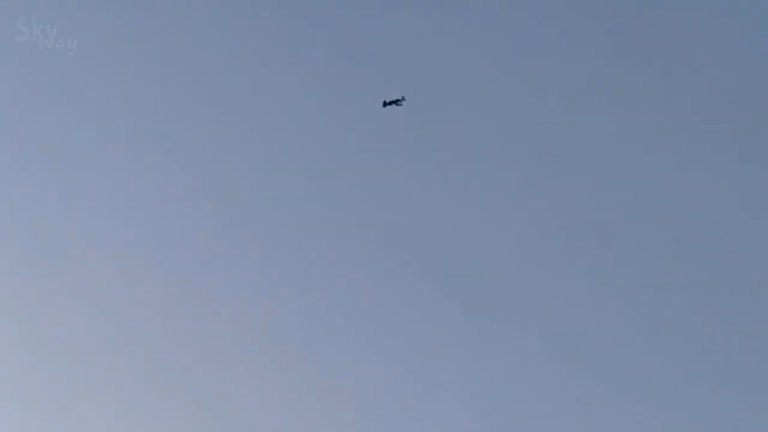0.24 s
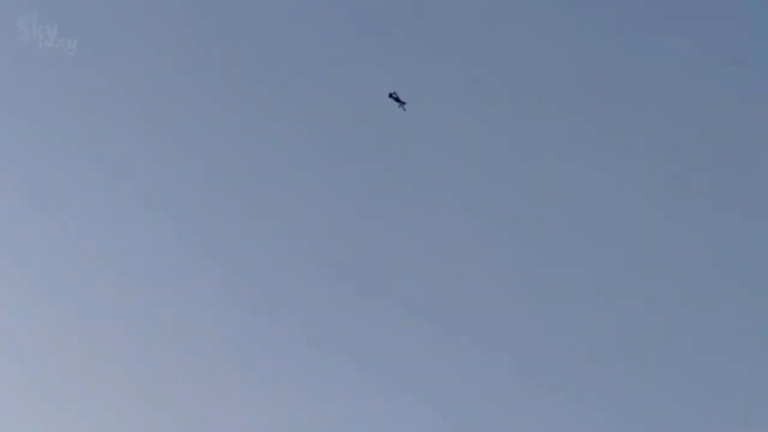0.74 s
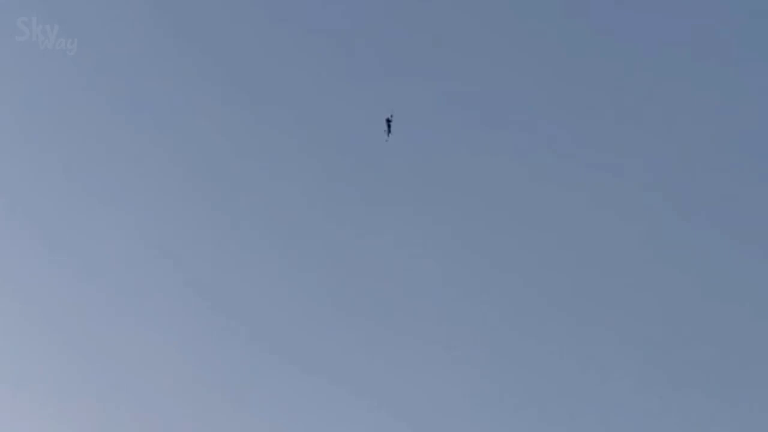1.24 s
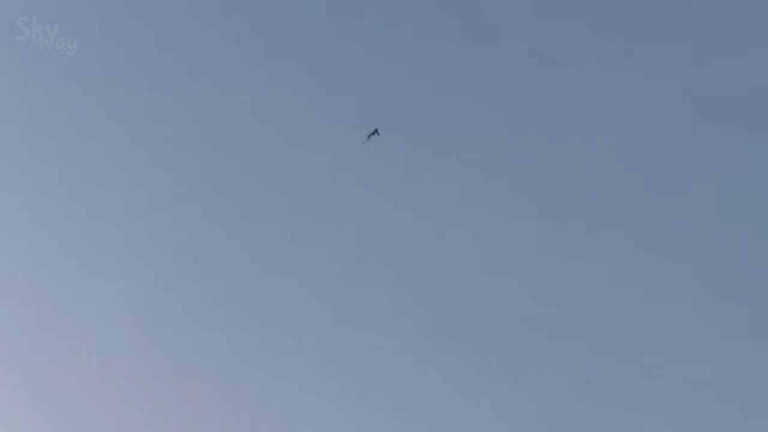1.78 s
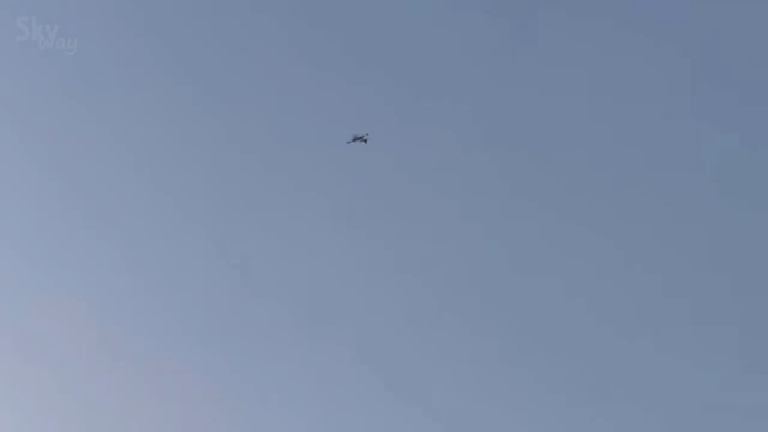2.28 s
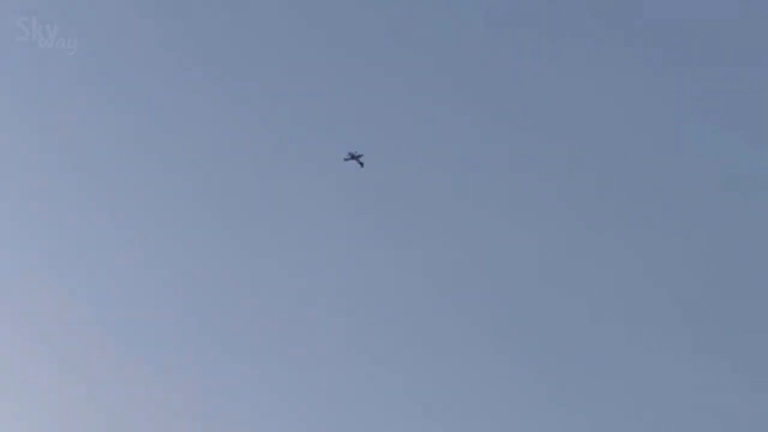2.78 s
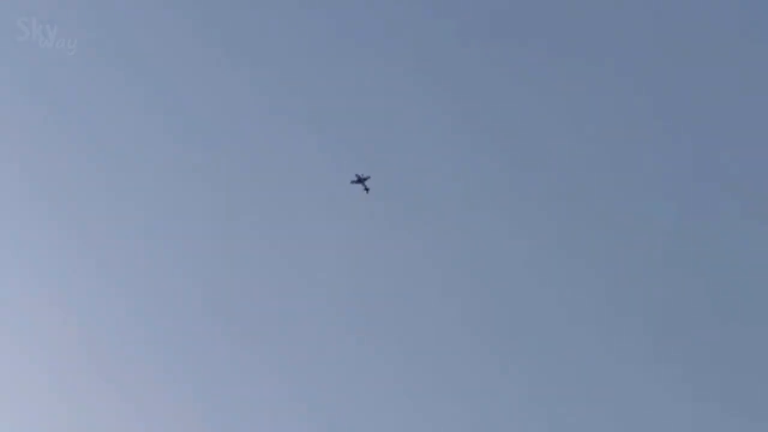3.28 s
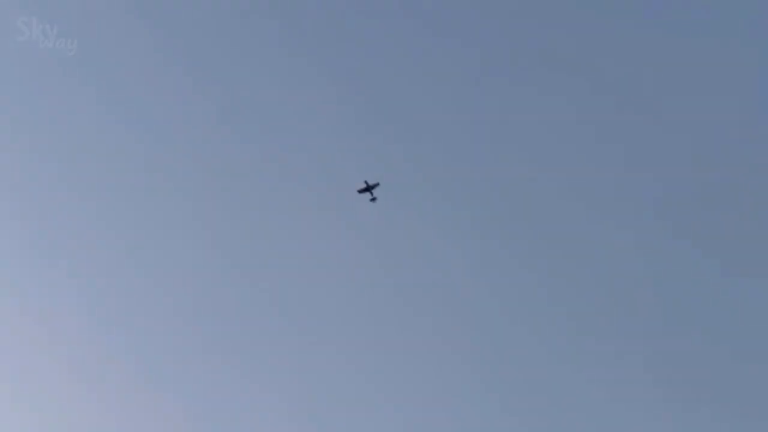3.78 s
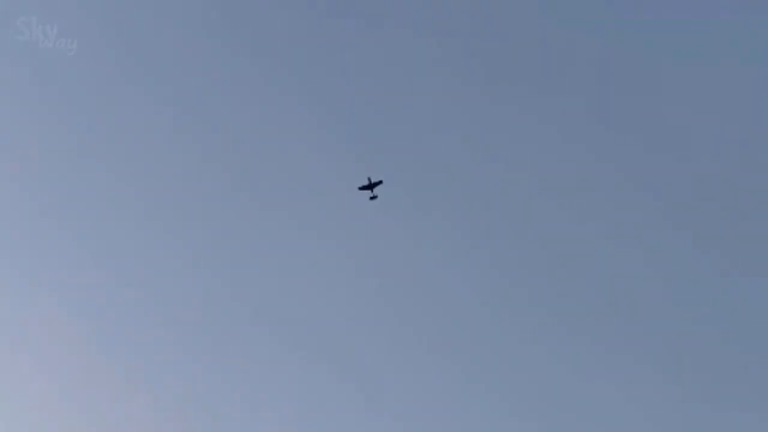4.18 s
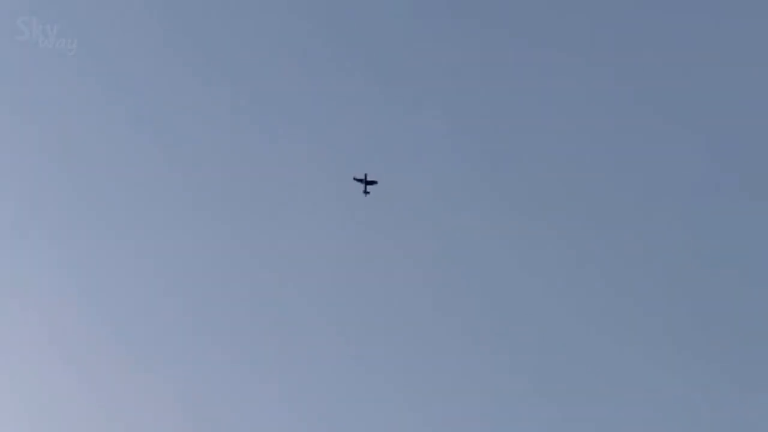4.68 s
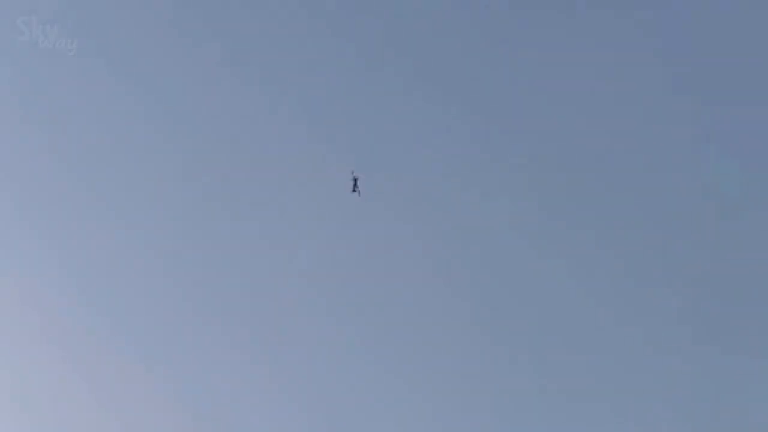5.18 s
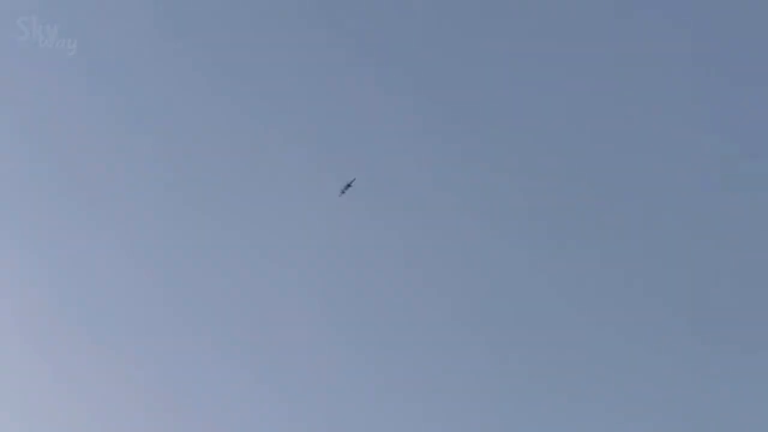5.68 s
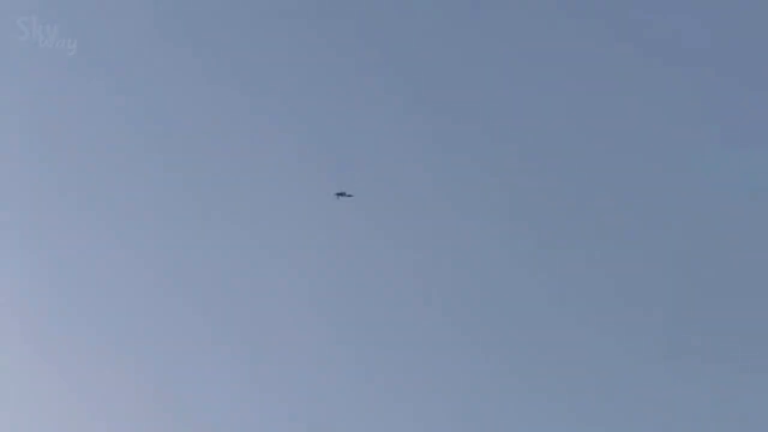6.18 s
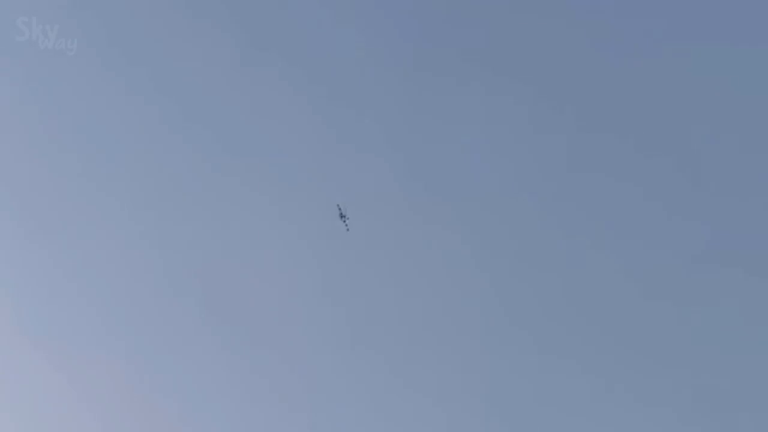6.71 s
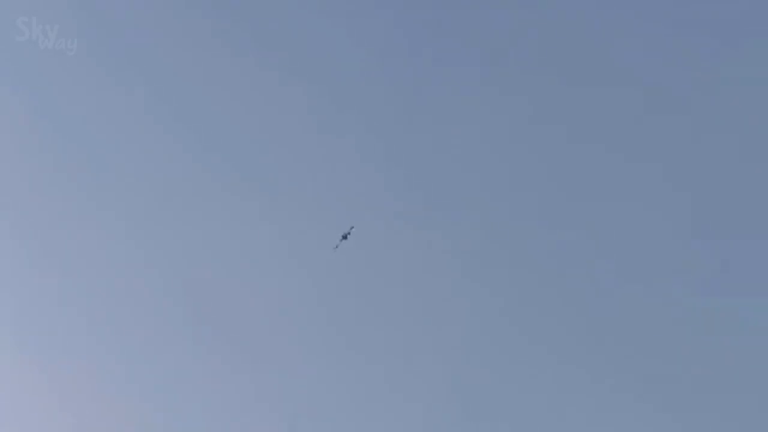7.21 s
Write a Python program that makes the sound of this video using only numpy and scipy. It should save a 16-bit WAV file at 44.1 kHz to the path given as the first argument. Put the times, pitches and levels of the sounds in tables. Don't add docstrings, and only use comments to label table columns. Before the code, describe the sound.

A single aerobatic piston plane is heard far overhead in open air through a small handheld camera. The deep drone around 125 hertz flutters through turbulent air, dips midway, returns fuller with patchy breathy rasp, then snarls briefly with propeller-tip buzz. Afterwards it weakens and rises in pitch, with a dull late echo from a far slope. Soft wind bumps and low air rumble lie underneath.

```python
import sys
import numpy as np
from scipy import signal
from scipy.fft import rfft, irfft, next_fast_len
from scipy.io import wavfile
from scipy.ndimage import uniform_filter1d, map_coordinates

SR = 44100
rng = np.random.default_rng(int(sys.argv[2]) if len(sys.argv) > 2 else 0)


def output_pcm(signal):
    pcm = np.clip(np.atleast_2d(signal).T, -1, 1) * 32767
    wavfile.write(sys.argv[1], SR, np.round(pcm).astype(np.int16))


def invert_db(level):
    return 10 ** (np.asarray(level, dtype=float) / 20)


N = 328545
T = np.arange(N) / SR
FFT = next_fast_len(N)
HZ = np.maximum(np.fft.rfftfreq(FFT, 1 / SR), 1)

# time in seconds, level in dB.
HUM_LEVEL = [(0, -22), (.44, -19.5), (.62, -21), (.74, -30), (1.06, -20), (1.3, -19), (2.14, -21),
             (2.55, -29), (2.68, -26.5), (2.94, -25.5), (3.67, -16), (4.34, -13.5), (4.85, -15.5),
             (5.5, -18.5), (5.73, -22.5), (6.3, -25.5), (6.42, -33), (7.45, -34)]
# time in seconds, rasp in dB, brightness in dB, throb in dB.
EXHAUST_AIM = [(0, -48, 4, -41), (.3, -35.5, -2, -50), (.55, -37, -2.5, -44), (.9, -40.5, 0, -39),
               (1.24, -43.5, 4, -42), (1.75, -49.5, -2.5, -57), (2.2, -48.5, 2, -66), (2.5, -43, -2, -57),
               (3.25, -42, -3, -46.5), (3.6, -43, 3, -42.5), (4.2, -42, 3, -53), (4.65, -35, 6, -42),
               (5.1, -38.5, 4.5, -36), (5.6, -41, 2, -38), (6.0, -46.5, 5.5, -43), (6.7, -50.5, 4, -32),
               (7.0, -45, -5.5, -30), (7.45, -49, 3.5, -25.5)]
THROB_REST_DB, HUM_REST_DB, RASP_REST_DB = -43, -21, -40


def curves(table):
    s, *columns = np.transpose(table)
    return [np.interp(T, s, column) for column in columns]


def colour(points):
    hz, db = np.transpose(points)
    return invert_db(np.interp(np.log(HZ), np.log(hz), db))


def unit(x):
    return x / np.sqrt(np.mean(x ** 2))


def walk(rate):
    knots = rng.standard_normal(400)
    return map_coordinates(knots, [T[::32] * min(rate, 50)], order=3).repeat(32)[:N]


def bumps(events):
    return sum(db * np.exp(-((T - s) / length) ** 2) for s, db, length in events)


def line(cycle, multiple, flutter_db, wander, lead):
    shake = invert_db(flutter_db * walk(11))
    turn = 2 * np.pi * multiple * cycle + lead + wander * uniform_filter1d(walk(9), 64)
    return np.sqrt(2) * shake * np.exp(1j * turn)


def bands(source, shape, level_db):
    spectrum = rfft(source, FFT) * shape
    out = 0
    for hz in 25 * 2 ** (np.arange(29) / 3):
        third_octaves = np.clip(1.5 * np.log2(HZ / hz), -.5, .5)
        window = np.cos(np.pi * third_octaves) ** 2
        out = out + invert_db(level_db(hz)) * irfft(spectrum * window, FFT)[..., :N]
    return out


def engine_cycle():
    # time in seconds, firings a second as heard on the ground.
    firing_rate = [(0, 120.4), (.25, 120.9), (.8, 124.9), (1.1, 126.1), (1.6, 126.6), (2.0, 126.1),
                   (2.8, 124.3), (3.0, 124.3), (3.6, 126.7), (4.4, 128.2), (4.88, 128.4), (5.07, 131.8),
                   (5.27, 133.5), (5.45, 133.4), (5.8, 132.8), (6.2, 135.1), (6.8, 140.4), (7.45, 148.0)]
    return np.cumsum(curves(firing_rate)[0]) / SR / 6


def propeller(cycle):
    # time in seconds, lopsidedness (octave against hum) in dB, edge-on buzz in dB.
    disc_tilt = [(0, -13, -46), (.44, -9.5, -49), (.62, -16, -55), (.8, -2.5, -46), (1.15, -25.5, -60),
                 (2.14, -22, -58), (2.55, -10, -52.5), (2.7, -18.5, -50.5), (2.94, -9.5, -54),
                 (3.34, -14.5, -52), (4.34, -14, -45.5), (4.87, -4.5, -33), (5.15, -19, -27.5),
                 (5.5, -13, -32.5), (5.75, -14, -41), (6.02, -9, -49.5), (6.33, -17.5, -51),
                 (7.45, 6, -55.5)]
    # multiple of the firing rate, level in dB.
    buzz_partials = [(4, 0), (5, 0), (6, -6), (7, -5), (8, -10), (9, -16), (10, -11), (11, -12), (12, -24),
                     (13, -26)]
    # time in seconds, gain in dB, length in seconds.
    flashes = [
        (4.63, 4, 0.033),
        (4.69, -4, 0.025),
        (4.76, 1.5, 0.034),
        (4.94, -1, 0.034),
        (5.01, -2.5, 0.02),
        (5.12, 4.5, 0.063),
        (5.25, -5, 0.028),
        (5.33, -0.5, .04),
        (5.45, -2, 0.045),
    ]
    hum_db = curves(HUM_LEVEL)[0]
    lopsided_db, buzz_db = curves(disc_tilt)
    ahead_db = np.interp(T + 0.46, T, buzz_db)
    third_db = np.minimum(np.maximum(buzz_db, ahead_db) + 2, -27.5)
    skew = 2.2
    out = invert_db(hum_db) * line(cycle, 6, flutter_db=0.36, wander=0.074, lead=0)
    out += invert_db(hum_db + lopsided_db) * line(cycle, 12, flutter_db=1.06, wander=0.14, lead=np.pi)
    out += invert_db(third_db) * line(cycle, 18, flutter_db=0.2, wander=0.43, lead=skew)
    flare_db = bumps(flashes)
    steady = np.clip(1 - flare_db / 7, .2, 1)
    for k, db in buzz_partials:
        tip_db = buzz_db + min(k - 4, 1) * flare_db + (k == 4) * 1.6
        sharper_db = .04 * (k - 5) * (tip_db + 26)
        flutter_db = min(1.4 * (k - 3), 4) * steady
        early = skew + max(k - 5, 0) / 2
        out += invert_db(tip_db + db + sharper_db) * line(cycle, 6 * k, flutter_db, wander=.035 * k, lead=early)
    return out


def exhaust_lines(cycle):
    # multiple of the engine cycle, level in dB against the throb.
    throb_partials = [(8, -1), (9, -13.5), (10, -14)]
    throb_db = curves(EXHAUST_AIM)[2]
    above_rest_db = throb_db - THROB_REST_DB
    pipe_db = -40.5 + 0.4 * above_rest_db + 1.1 * walk(1.91)
    pairs_db = -46.5 + 0.22 * above_rest_db + 2.7 * walk(1.2)
    out = invert_db(pipe_db) * line(cycle, 14, flutter_db=0.4, wander=0.059, lead=0)
    out += invert_db(pairs_db) * line(cycle, 4, flutter_db=3.5, wander=0.14, lead=0)
    for k, db in throb_partials:
        out += invert_db(throb_db + db) * line(cycle, k, flutter_db=.8, wander=.1, lead=7 * rng.random())
    return out


def uneven_cylinders(cycle):
    # multiple of the engine cycle, level in dB.
    flank_partials = [(15, -2), (20, -5.5), (26, -8)]
    # multiple of the engine cycle, rms level in dB.
    uneven_partials = [(3, -48.5), (5, -48.5), (7, -53.5), (9, -47.5), (10, -51.5), (11, -49.5), (16, -52),
                       (17, -51), (21, -57.5), (22, -69.5), (23, -67.5), (25, -55), (27, -51), (28, -70.5),
                       (29, -64.5), (42, -55)]
    flank_db = 0.5 * (curves(HUM_LEVEL)[0] - HUM_REST_DB)
    out = 0
    for k, db in flank_partials:
        level_db = -44 + flank_db + db
        out = out + invert_db(level_db) * line(cycle, k, flutter_db=4.0, wander=0.069, lead=7 * rng.random())
    for k, db in uneven_partials:
        level_db = db + (k > 15) * flank_db / 2 + 2.0 * walk(1.3)
        out += invert_db(level_db) * line(cycle, k, flutter_db=1.4, wander=.25, lead=7 * rng.random())
    return out


def habit(cycle):
    shapes = rng.standard_normal((40, 2049))
    return unit(map_coordinates(shapes, [T * 4.0, cycle % 1 * 2048], order=1))


def exhaust_gas(cycle):
    cylinder_db = [0.5, 0, 1.5, -7, 1.5, -4]
    # frequency in Hz, level in dB per Hz.
    rasp_colour = [(60, -9), (200, -3.5), (500, -4.5), (1000, -3), (2000, -3), (2800, -11), (3500, -20.5),
                   (5000, -16.5), (6000, -22.5), (6800, -36), (9500, -33.5), (12000, -38), (15000, -33)]
    # time in seconds, gain in dB, length in seconds, centre in
    # Hz.
    eddy_events = [(0.436, 6.5, 0.085, 3100), (0.593, 4, 0.044, 940), (0.467, 0.5, .06, 1600),
                   (1.06, 3, 0.025, 750), (1.204, 4, 0.021, 1000), (2.1, 6, 0.074, 5000),
                   (2.333, 10, 0.02, 1400), (2.393, -0.5, 0.021, 1250), (2.517, 7, 0.074, 3060),
                   (2.604, 4.5, 0.077, 1280), (2.758, -16, 0.016, 1750), (2.845, -9, 0.0091, 1500),
                   (2.948, -10, .027, 1300), (3.005, 9.5, 0.015, 1980), (3.19, -4, 0.027, 890),
                   (3.37, -4, 0.019, 1100), (3.436, 3.5, 0.076, 4500), (3.654, -5, 0.031, 1550),
                   (3.883, 6, 0.043, 1750), (3.96, 4.5, 0.045, 2400), (4.242, -6.5, 0.036, 1550),
                   (4.307, 2.5, .06, 5040), (4.373, 5.5, 0.046, 1280), (4.48, -7, 0.039, 5000),
                   (4.534, -1.5, 0.018, 990), (4.728, 3.5, 0.025, 900), (4.955, 5.5, 0.062, 1090),
                   (5.064, 4, 0.053, 2640), (5.24, -10, 0.026, 1000), (5.605, 6, 0.17, 5200)]
    level_db, bright_db, _ = curves(EXHAUST_AIM)
    eddies_db = np.array([bumps([row[:3]])[::32] for row in eddy_events])
    eddy_hz = np.array(eddy_events)[:, -1]
    low_db = 2.4 - 0.4 * (level_db - RASP_REST_DB)
    upper_db, treble_db = -3 + bright_db, -2 + .8 * bright_db

    firing = (6 * cycle + .5).astype(int)
    luck_db = 3.9 * np.tanh(rng.standard_normal(firing[-1] + 1))
    size_db = np.array(cylinder_db)[firing % 6] + luck_db[firing]
    puff = 0.87 + invert_db(size_db) * np.cos(np.pi * 6 * cycle) ** 4

    ripple = 0.19 * np.cos(2 * np.pi * HZ / 478.2) * np.exp(-HZ / 2000.0)
    shape = colour(rasp_colour) * (1 + ripple)
    middle = (HZ > 950) & (HZ < 1700)
    shape = shape / np.sqrt(np.sum(shape[middle] ** 2) / len(HZ))
    gust = walk(18)

    def band_db(hz):
        octave = np.log2(hz / 1300)
        low = np.interp(octave, [-1, 0], [1, 0])
        upper = np.interp(octave, [0, .8, 1.6], [0, 1, 0])
        high = np.interp(octave, [.8, 1.6], [0, 1])
        tilt_db = low * low_db + upper * upper_db + high * treble_db
        patches_db = 0.41 * gust + 2.5 * np.tanh(walk(24)) + .4 * walk(4.05)
        reach = 0.14 + (1 - 0.14) * np.exp(-(np.log2(hz / eddy_hz) / 0.63) ** 2)
        eddy_db = (reach @ eddies_db).repeat(32)[:N]
        return level_db + tilt_db + eddy_db + patches_db

    flow = 0.95 * rng.standard_normal((2, N)) + np.array([[.7], [0]]) * habit(cycle)
    return bands(unit(puff) * flow, shape, band_db)


def slope_echo(lines):
    # time in seconds, strength in dB.
    echo_level = [
        (0, -39),
        (6.1, -35),
        (6.6, -12.5),
        (7.45, -15.5),
    ]
    late = np.roll(lines.real, int(.9 * SR))
    dull = signal.butter(2, 220., fs=SR, output="sos")
    return invert_db(curves(echo_level)[0]) * signal.sosfilt(dull, late)


def wind_thumps():
    # start in seconds, peak in dB, pitch in Hz.
    gusts = [(0.799, -30, 65), (1.099, -27, 65), (1.249, -20, 65), (2.049, -32, 65), (2.419, -31, 65),
             (2.919, -44, 65), (3.219, -33, 65), (3.599, -35, 65), (3.779, -29, 65), (4.049, -25, 66),
             (4.349, -29, 65), (5.099, -36, 65), (5.619, -51, 65), (7.099, -36, 66)]
    out = np.zeros(N)
    for s, db, hz in gusts:
        age = T - s - .02
        out += invert_db(db) * np.exp(-(age / 0.0097) ** 2) * np.cos(2 * np.pi * hz * age)
    return out


def open_air():
    # frequency in Hz, level in dB per Hz.
    air_colour = [(22, -14), (35, -17), (50, 6), (70, -14.5), (100, 8), (200, -0.5), (500, -12),
                  (1500, -21), (3000, -25), (6000, -39), (7000, -44.5), (15000, -54)]
    swell = walk(1.0)
    noise = rng.standard_normal((2, N))
    hush = bands(noise, colour(air_colour), lambda hz: 0.44 * swell + 1.0 * walk(1.7))
    return invert_db(-39) * hush / np.sqrt(np.mean(hush[0] ** 2))


def mains():
    return invert_db(-50.5) * line(T, 48.9, flutter_db=3.0, wander=.2, lead=0).real


def scene():
    # frequency in Hz, side minus mid in dB.
    stereo_width = [(40, -24.5), (110, -54), (200, -27), (300, -18.5), (700, -11.5), (1200, -7),
                    (1900, -22.5), (2700, -1.5), (3700, -14), (4500, -2), (5200, -28.5), (6300, 8),
                    (8500, -3), (12000, -10), (15000, -17.5)]
    cycle = engine_cycle()
    lines = propeller(cycle) + exhaust_lines(cycle) + uneven_cylinders(cycle)
    noise = exhaust_gas(cycle) + open_air()
    mid = lines.real + noise[0] + slope_echo(lines) + wind_thumps() + mains()
    across = 1.2 * lines.imag + 1.24 * noise[1] - 0.11 * noise[0]
    side = irfft(rfft(across, FFT) * colour(stereo_width), FFT)[:N]
    return np.array([mid + side, mid - side])


def low_pass(x):
    return signal.sosfilt(signal.butter(12, 15680, fs=SR, output="sos"), x)


def record(dry):
    # frequency in Hz, level in dB.
    clock_whine = [(7803.5, -54), (11700.5, -57)]
    whine = sum(invert_db(db) * np.cos(2 * np.pi * hz * T) for hz, db in clock_whine) * dry.mean(axis=0)
    top_cut = signal.butter(6, 14300, fs=SR, output="sos")
    return low_pass(signal.sosfilt(top_cut, dry + whine))


dry = scene()
out = record(dry)
output_pcm(out)
```